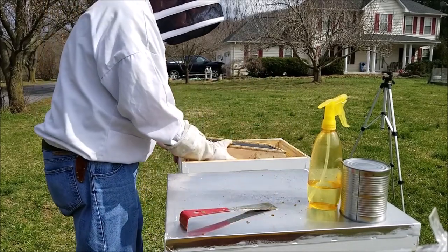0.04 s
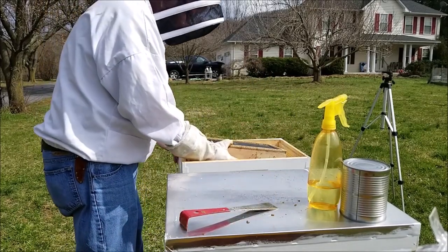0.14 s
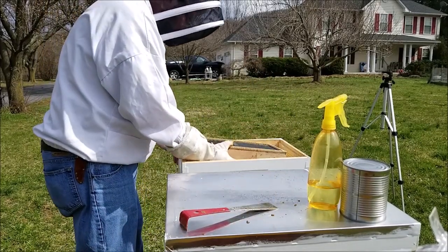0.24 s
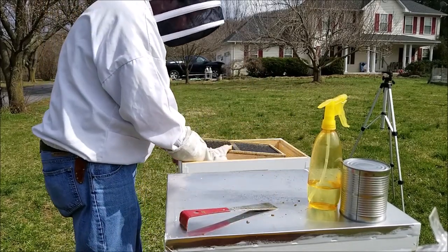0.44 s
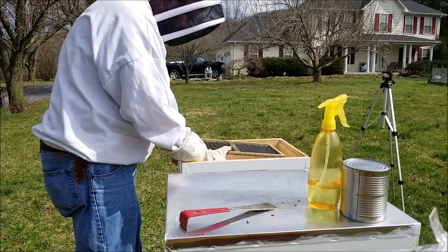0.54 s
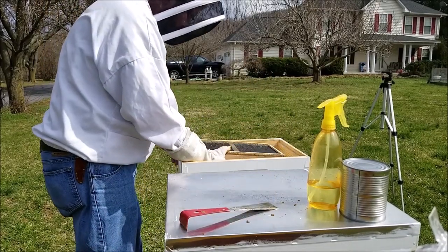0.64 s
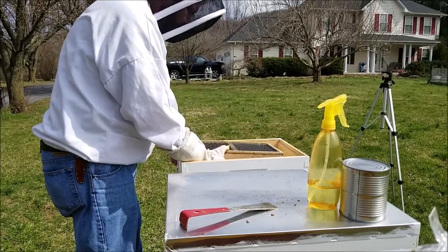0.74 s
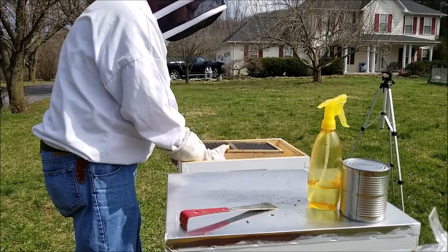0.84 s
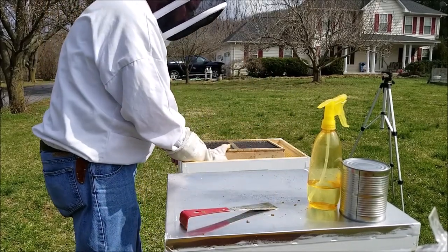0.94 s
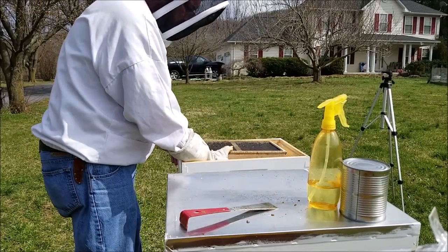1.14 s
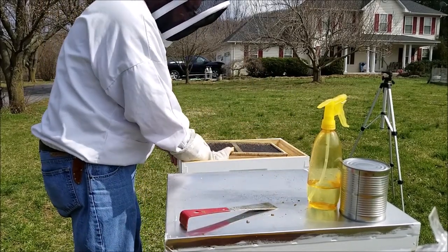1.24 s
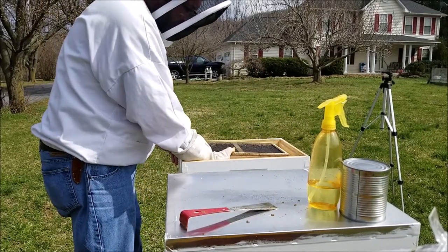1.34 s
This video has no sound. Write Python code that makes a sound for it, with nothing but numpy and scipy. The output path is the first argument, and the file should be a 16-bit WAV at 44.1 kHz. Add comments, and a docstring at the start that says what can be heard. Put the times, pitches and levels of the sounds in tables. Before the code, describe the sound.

In a quiet yard, a bee hovers very close on the right, its wavering buzz flaring as it hits the microphone twice. Then the buzz and low wind rumble fade, leaving faint wooden knocks and scratches from a hive.

```python
"""A breeze rumbles on both microphone ports in a quiet yard; a wooden hive frame knocks softly.
From 0.13 s a honeybee hovers at the right port, each wingbeat a pressure dip with a puff of air.
It bumps the case near 0.25 s and 0.75 s, wings slapping and ticking, and leaves by 0.93 s.
Then the breeze dies away and the frame is shifted, with dull knocks and small scratches."""
import sys
import numpy as np
from scipy import signal
from scipy.fft import rfft, irfft
from scipy.io import wavfile
from scipy.ndimage import uniform_filter1d

SR = 44100
rng = np.random.default_rng(int(sys.argv[2]) if len(sys.argv) > 2 else 0)


def digitize_waveform(pressure):
    """Quantize a signal to 16-bit integers and store it at the path in sys.argv[1].

    Rows of a 2-D input are taken as channels; values are limited to [-1, 1].
    """
    field = np.atleast_2d(pressure).T
    bounded = np.clip(field, -1, 1)
    quanta = np.round(bounded * 32767).astype(np.int16)
    wavfile.write(sys.argv[1], SR, quanta)


N = 61739


def undb(db):
    """Decibels to gain."""
    return 10 ** (np.asarray(db) / 20)


def curve(rows, column=1):
    """Table column, linearly interpolated over time."""
    rows = np.array(rows)
    return np.interp(np.arange(N) / SR, rows[:, 0], rows[:, column])


def colour(points, hz):
    """Gain of a spectrum at hz, interpolated over log frequency."""
    points_hz, db = np.array(points).T
    return undb(np.interp(np.log(np.maximum(hz, 1)), np.log(points_hz), db))


def noise(points):
    """Coloured noise, rms 1."""
    bins_hz = np.arange(N // 2 + 1) * SR / N
    x = irfft(rfft(rng.standard_normal(N)) * colour(points, bins_hz), N)
    return x / x.std()


def walk(hz):
    """Smooth random drift, standard deviation 1."""
    hold = max(int(SR / hz), 1)
    steps = np.repeat(rng.standard_normal(N // hold + 1), hold)
    x = uniform_filter1d(uniform_filter1d(steps, hold), hold)[:N]
    return x / x.std()


def burst(t, start_s, attack_s, decay_s):
    """Linear rise, exponential fall."""
    rise = np.clip((t - start_s) / attack_s, 0, 1)
    return rise * np.exp(-np.maximum(t - start_s - attack_s, 0) / decay_s)


def bee(t):
    """Wingbeats drive tone, hiss and contacts, so near the right port that the left barely hears."""
    # wingbeat (time [s], rate [Hz])
    wingbeat = [(.15,260.3),(.204,259),(.234,247.2),(.249,267.7),(.261,254.7),(.274,235.8),(.292,229.4),(.306,254.5),(.322,233.1),(.36,235),(.42,247.8),(.49,254.3),(.516,244.5),(.55,251),(.566,246),(.59,250.9),(.612,257.8),(.642,239),(.66,242.9),(.694,233.9),(.722,254.6),(.743,249.2),(.757,281.6),(.773,227.3),(.79,242.5),(.806,234.3),(.828,256.8),(.862,242.2),(.91,254)]
    first_strike_s, jitter_turns, left_db = .246, .005, -45
    beat_hz = curve(wingbeat)
    turns = np.cumsum(beat_hz) / SR
    turns = turns - np.interp(first_strike_s, t, turns) + jitter_turns * walk(hz=250)
    buzz = wing_tone(t, turns, beat_hz) + wing_wash(turns) + wing_touches(t, turns, beat_hz)
    return np.array([undb(left_db) * buzz, buzz])


def wing_tone(t, turns, beat_hz):
    """Harmonics of the stroke; a nasal peak moves through them as the bee turns."""
    # relative buzz levels (time [s], fundamental [dB], octave [dB], overtones [dB])
    buzz_levels = [(0.129,-80,-58,-71),(.17,-56,-67,-64),(0.201,-38,-46.5,-51),(0.224,-36.5,-36,-42),(.236,-22,-24.5,-29.5),(0.248,-22,-63,-35),(.27,-28.5,-27,-37),(0.284,-24,-31.5,-48.5),(0.298,-43,-41,-47),(.32,-35.5,-44,-50.5),(0.356,-30,-35.5,-54),(0.424,-42,-46,-59),(0.452,-32.5,-39,-53),(0.473,-39,-43.5,-58.5),(0.518,-31.5,-35,-48),(0.579,-28.5,-32,-43),(0.597,-35.5,-39.5,-40),(.612,-25,-29.5,-44),(.645,-43.5,-43,-48),(.685,-43,-42.5,-51.5),(0.722,-33,-35,-39.5),(0.737,-35,-29.5,-46),(0.753,-19.5,-26,-33.5),(0.771,-26.5,-35.5,-43.5),(.79,-23.5,-26,-57),(0.812,-36,-34.5,-43.5),(.835,-33.5,-32,-41),(0.864,-54,-43,-53.5),(0.898,-54.5,-48.5,-54.5),(0.924,-73.5,-81.5,-90)]
    # overtone spectrum (frequency [Hz], gain [dB])
    overtones = [(740,-1.5),(1000,-5),(1250,-5.5),(1500,-9),(1750,-7.5),(2050,-10.5),(2500,-20.5),(3300,-22),(4500,-30.5),(6000,-42.5)]
    # nasal peak (time [s], centre [Hz])
    whine = [(.15,1200),(.232,1065),(.25,830),(.28,720),(.31,940),(.35,1290),(.45,1340),(.5,1290),(.53,860),(.58,906),(.598,1030),(.615,1329),(.632,1290),(.648,690),(.72,742),(.79,900),(.835,1592),(.89,670)]
    peak_db, peak_width_octaves = 7.5, .21
    wander_db, wander_rad, wander_hz = 2.5, .3, 26
    times_s, *levels_db = np.array(buzz_levels).T
    first_db, second_db, upper_db = (np.interp(t, times_s, db, left=-120, right=-120) for db in levels_db)
    angle = 2 * np.pi * turns
    tone = undb(first_db + 2.5) * np.cos(angle) + undb(second_db + .5) * np.cos(2 * angle)
    centre_hz = curve(whine)
    for k in range(3, 24):
        offset_sq = (np.log2(k * beat_hz / centre_hz) / peak_width_octaves) ** 2
        whine_db = peak_db * (1 - offset_sq) * np.exp(-offset_sq / 2)  # a hollow on each side
        shift_rad = wander_rad * np.sqrt(k / 2) * walk(wander_hz)
        level_db = upper_db + whine_db + wander_db * walk(wander_hz)
        tone += colour(overtones, k * beat_hz) * undb(level_db) * np.cos(k * angle + shift_rad)
    return -np.sqrt(2) * tone  # each beat is a pressure dip


def wing_wash(turns):
    """Air pushed over the port hisses, swelling once a beat."""
    # hiss (time [s], relative level [dB])
    wash_levels = [(.13,-75),(.18,-55.5),(.225,-46),(.25,-30.5),(.285,-47.5),(.35,-47),(.42,-55),(.52,-48.5),(.585,-45),(.67,-53.5),(.735,-50),(.78,-37),(.83,-49),(.895,-59.5),(.925,-86.5)]
    # hiss spectrum (frequency [Hz], density [dB])
    wash_colour = [(100,2.5),(600,10.5),(1500,8),(3000,-2),(4800,-2),(6500,-6.5),(9000,-5.5),(12000,-4),(16000,-6)]
    pulsing = 1 + .45 * np.cos(2 * np.pi * turns)
    return noise(wash_colour) * undb(curve(wash_levels) + 1) * pulsing


def wing_touches(t, turns, beat_hz):
    """Against the case, each beat makes a hollow slap, a bright tick and a scuff."""
    # contacts, relative levels (start [s], length [s], slap [dB], tick [dB], scuff [dB], fade [dB])
    touches = [(.2442,.0075,-3,-15,-29,0),(.2520,.0112,-14,-12,-32,4),(.7488,.003,-9,-22,-33,0),(.7524,.0185,-12,-9,-26,11),(.7765,.024,-25,-30,-30,0),(.8015,.017,-23,-23,-38,3)]
    # tick spectrum (frequency [Hz], density [dB])
    tick_colour = [(200,4.5),(900,1.5),(1800,12.5),(2700,2.5),(4000,5.5),(6300,-7.5),(8500,0.5),(11000,0.5),(13000,-2.5),(16000,-2.5)]
    # scuff spectrum (frequency [Hz], density [dB])
    scuff_colour = [(150,-6.5),(400,6),(1000,2.5),(2000,-12),(4300,-13),(6500,-29.5),(16000,-29.5)]
    slap_width_s, rebound_s, tick_decay_s, edge_s = .00018, .00036, .00049, .001
    case_hz, case_q, case_db = 815, 1.3, -7.5
    from_beat_s = ((turns + .5) % 1 - .5) / beat_hz
    suction = np.exp(-np.abs(from_beat_s) / slap_width_s)
    rebound = .45 * np.exp(-np.abs(from_beat_s - rebound_s) / slap_width_s)
    slap = signal.sosfilt(signal.butter(1, 200, "high", fs=SR, output="sos"), rebound - suction)
    slap += undb(case_db) * signal.lfilter(*signal.iirpeak(case_hz, case_q, fs=SR), slap)
    tick = noise(tick_colour) * np.exp(-(turns % 1) / beat_hz / tick_decay_s)
    scuff = noise(scuff_colour) * 2 * np.exp(1.3 * (np.cos(2 * np.pi * turns) - 1))
    out = np.zeros(N)
    for start_s, length_s, slap_db, tick_db, scuff_db, fade_db in touches:
        age_s = t - start_s
        gate = np.clip(np.minimum(age_s, length_s - age_s) / edge_s + .5, 0, 1)
        fade = undb(-fade_db * np.clip(age_s / length_s, 0, 1))
        contact = undb(slap_db + .5) * slap + undb(tick_db + 1.5) * tick + undb(scuff_db + 4) * scuff
        out += gate * fade * contact
    return out


def breeze():
    """Low buffeting, independent on the two ports."""
    # gusts (time [s], left [dB], right [dB])
    gusts = [(0,-38,-51),(.07,-35,-42),(.11,-51.5,-49),(.16,-48,-56),(.2,-40.5,-55),(.245,-35.5,-34),(.278,-36.5,-35),(.31,-55,-53),(.39,-43.5,-55),(.45,-44.5,-67),(.53,-39.5,-60),(.6,-52.5,-41.5),(.66,-52.5,-41.5),(.72,-46,-54.5),(.76,-50,-57.5),(.81,-39,-57.5),(.88,-61.5,-46.5),(.97,-58.5,-61),(1.06,-69,-62),(1.13,-76.5,-82.5),(1.4,-68,-86)]
    # rumble spectrum (frequency [Hz], density [dB])
    breeze_colour = [(15,-31.5),(30,-14.5),(50,-4),(105,-1),(160,-8.5),(250,-15.5),(500,-34.5),(1200,-63.5)]
    return np.array([noise(breeze_colour) * undb(curve(gusts, side)) for side in (1, 2)])


def hive_frame(t):
    """Shifted wood: dry scratches and dull knocks with a short hollow ring."""
    # knocks (start [s], relative level [dB], attack [s], pitch [Hz])
    knocks = [(0.061,-50.5,0.0043,505),(0.959,-64,.012,290),(1.018,-65,0.0099,300),(1.032,-69,0.0092,500),(1.191,-59.5,0.0075,425),(1.244,-60.5,0.0078,300),(1.347,-67,0.007,388)]
    # knock spectrum (frequency [Hz], density [dB])
    knock_colour = [(80,-11),(200,2),(290,-2),(470,-1.5),(700,-12.5),(1100,-26.5),(2500,-36),(8000,-54)]
    # scratches (start [s], relative level [dB], decay [s])
    scratches = [(1.068,-65,0.0047),(1.212,-67,.008),(1.228,-74.5,0.083)]
    # scratch spectrum (frequency [Hz], density [dB])
    scratch_colour = [(500,-5.5),(1500,-11.5),(2300,2),(3200,-13),(6000,-4.5),(9000,-11),(16000,-15)]
    scratch_attack_s, thud_db = .00192, -3.5
    out = np.zeros(N)
    scrape, thud = noise(scratch_colour), noise(knock_colour)
    for start_s, db, decay_s in scratches:
        out += undb(db) * burst(t, start_s, scratch_attack_s, decay_s) * scrape
    for start_s, db, attack_s, pitch_hz in knocks:
        ring = signal.lfilter(*signal.iirpeak(pitch_hz, Q=3, fs=SR), thud)
        knock = ring / ring.std() + undb(thud_db) * thud
        out += undb(db) * burst(t, start_s, attack_s, decay_s=.026) * knock
    return out


def yard():
    """Soft, wide outdoor background that flickers and sinks."""
    # background (time [s], level [dB])
    yard_levels = [(0,-55),(.08,-62),(.13,-60.5),(.3,-58),(.45,-65),(.82,-58.5),(.93,-70.5),(1.08,-70),(1.15,-72),(1.3,-70.5),(1.4,-74.5)]
    # background spectrum (frequency [Hz], density [dB])
    yard_colour = [(60,-28),(250,-11),(480,-2),(750,-12),(1150,-13),(1700,-21),(2600,-24),(5000,-26),(7500,-29),(8200,-20.5),(10000,-29.5),(16000,-27)]
    level_db, flicker_db = curve(yard_levels), 1.5
    return np.array([noise(yard_colour) * undb(level_db + flicker_db * walk(hz=17)) for _ in range(2)])


def scene():
    """Stereo mix; the hive frame is nearly alike on both ports."""
    t = np.arange(N) / SR
    mix = bee(t) + breeze() + yard()
    frame_centre = hive_frame(t)
    frame_sides = np.array([hive_frame(t), hive_frame(t)])
    return mix + .73 * frame_centre + .45 * frame_sides


def record(dry):
    """Steep elliptic low-pass."""
    top_hz = 15800
    return signal.sosfilt(signal.ellip(10, .2, 80, top_hz, fs=SR, output="sos"), dry)


dry = scene()
out = record(dry)
digitize_waveform(out)
```